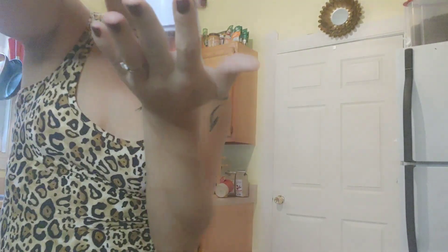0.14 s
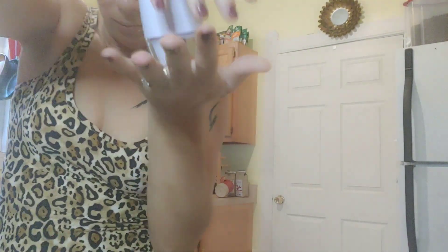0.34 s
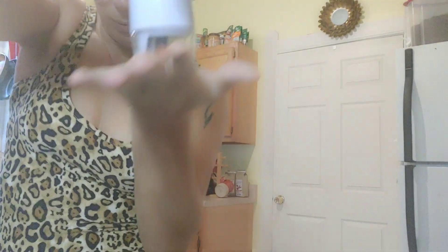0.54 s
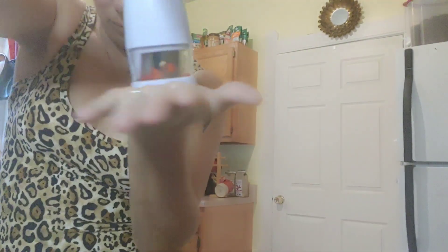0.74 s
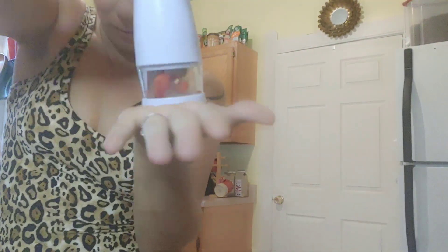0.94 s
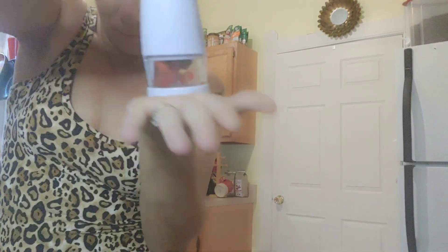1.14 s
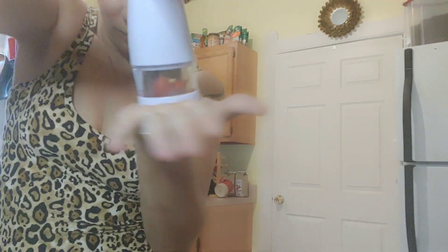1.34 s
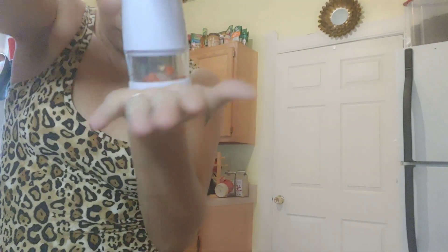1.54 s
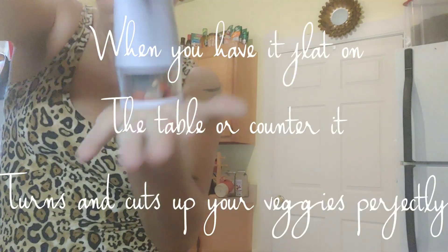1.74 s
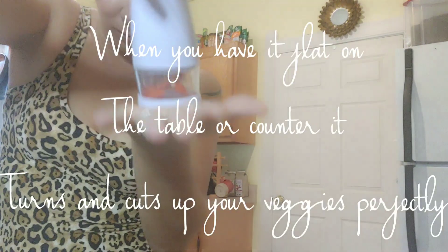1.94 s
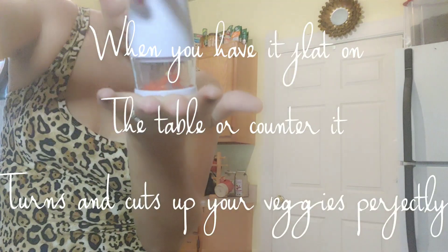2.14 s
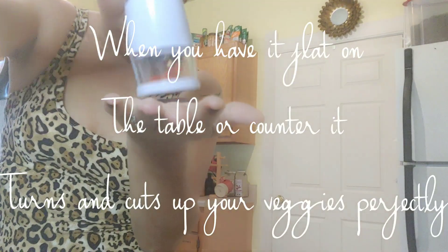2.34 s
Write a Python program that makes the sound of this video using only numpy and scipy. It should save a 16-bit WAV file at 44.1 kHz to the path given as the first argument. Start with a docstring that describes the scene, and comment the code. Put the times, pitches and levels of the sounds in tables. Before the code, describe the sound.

A plastic push chopper clacks rapidly, pumped about four times a second in a small kitchen

```python
"""Over a low rumble and wavering appliance hum comes the bright, chattering clack of a plastic push chopper.
It is pumped about four times a second on an open palm, close by in a small kitchen: shaped noise rubs and scrapes
along the barrel, then a burst of contacts, a thud and a gliding cup note make the dull chop. The spring throws the
plunger back against its stop with the clack, and narrow noise bands ring on. Reflections answer each stroke."""
import sys
import numpy as np
from scipy import signal
from scipy.fft import rfft, irfft, next_fast_len
from scipy.io import wavfile
from scipy.ndimage import uniform_filter1d, map_coordinates

SR = 44100
rng = np.random.default_rng(int(sys.argv[2]) if len(sys.argv) > 2 else 0)


def output_pcm(signal):
    """Save a mono or channel-first signal as 16-bit PCM at the path in sys.argv[1].

    Samples are clipped to [-1, 1] before scaling.
    """
    pcm = np.clip(np.atleast_2d(signal).T, -1, 1) * 32767
    wavfile.write(sys.argv[1], SR, np.round(pcm).astype(np.int16))


N = 110250

# Spectrum of the room rumble: (frequency [Hz], relative density [dB per Hz])
RUMBLE_SPECTRUM = [(20, -15), (45, -2.5), (62, -2), (90, -12.5), (130, -11), (240, -8.5), (400, -16),
                   (800, -27), (1800, -32.5), (4000, -40.5), (7500, -45.5), (9000, -55), (16000, -60)]
# Level of rumble and hum together: (time [s], level [dB])
BACKGROUND_LEVEL = [(0, -57), (.13, -58.5), (.2, -50), (.8, -47.5), (1.8, -47.5), (2.15, -49.5), (2.5, -49)]
# Hum lines: (frequency [Hz], mean level against the rumble [dB])
HUM_LINES = [(43.1, -5), (118.4, -10.5), (228, -8), (275, -11)]

# Decay of the kitchen's tail: (frequency [Hz], time to fall 60 dB [s])
ROOM_T60 = [(150, 0.02), (500, 0.6359), (1400, 0.43), (3700, 0.4826), (7000, .43), (11000, 0.31),
            (16000, 0.51)]
# Colour of that tail: (frequency [Hz], gain [dB])
ROOM_COLOUR = [(150, -2), (400, -4.5), (1000, -4), (2000, -1.5), (4500, -3), (8000, -4.5), (14000, -0.5)]
# Colour of the faint lingering echo: (frequency [Hz], relative gain [dB])
LATE_COLOUR = [(300, 2.5), (1500, 0.5), (5000, -2.5), (7300, -0.5), (9000, -6.5), (15000, -22)]

# Resonances of the barrel: (centre [Hz], width [Hz], gain [dB])
BARREL_MODES = [(1435, 190, -6.5), (1720, 170, -1.5), (1925, 70, 2), (2170, 150, -0.5)]
# Spectrum of the plunger's scrape: (frequency [Hz], relative density [dB per Hz])
SCRAPE_SPECTRUM = [(100, -6.5), (280, -4), (600, -5), (1100, -1), (2900, -4.5), (4300, -0.5), (5900, -3.5),
                   (7100, 5.5), (8600, -11.5), (11800, -7.5), (14000, -28.5), (16000, -34)]
# Spectrum of the chop: (frequency [Hz], relative density [dB per Hz])
CHOP_SPECTRUM = [(100, -24), (300, -10), (600, -5.5), (1100, 0.5), (1800, -10), (2600, -7.5), (5200, -8),
                 (7500, -10), (8600, -16), (11500, -25), (13000, -38.5), (16000, -44)]
# Spectrum of the thud on the palm: (frequency [Hz], relative density [dB per Hz])
THUD_SPECTRUM = [(50, -22), (150, -15), (300, 1.5), (480, 2.5), (800, -10), (2000, -34), (8000, -75)]
# Spectrum of the clack at the stop: (frequency [Hz], relative density [dB per Hz])
CLACK_SPECTRUM = [(100, -22.5), (300, -11), (650, -10), (1100, -2.5), (2000, -2.5), (2900, -11.5),
                  (4500, -3), (5800, -4), (7600, -6), (8700, -12), (12000, -10), (14000, -25), (16000, -37)]
# Spectrum of the knock on the housing: (frequency [Hz], relative density [dB per Hz])
KNOCK_SPECTRUM = [(80, -15), (220, -6.5), (450, -9.5), (700, -7), (1050, 0), (1350, -4.5), (2000, -20),
                  (6000, -55)]

# Pushes: (chop time [s], slide length [s], slide level [dB], scrape over the slide [dB], chop level [dB],
#          chop treble [dB], thud level [dB], cup note level [dB])
PUSHES = [(0.4187, .058, -36, 2.5, -19, -1, -24.5, -35), (0.6793, 0.047, -32, -1, -16.5, -3.5, -24, -30),
          (0.9363, .054, -30, -1, -21.5, 3, -32, -35), (1.167, .041, -29, 1.5, -21, 3.5, -23.5, -31),
          (1.394, .048, -30.5, 0, -21.5, -3, -28.5, -45), (1.626, 0.035, -33.5, 2.5, -16, 2, -26, -44),
          (1.8955, .050, -32.5, -0.5, -17.5, 2.5, -28.5, -44)]
# Returns: (clack time [s], slide length [s], slide level [dB], scrape over the slide [dB], chatter length [s],
#           clack level [dB], clack treble [dB], knock level [dB], spring level [dB], spring pitch [Hz],
#           upper spring ring level [dB], left over right [dB])
RETURNS = [(.214, .044, -33, 2, 0.0039, -17, -3, -30, -26, 7030, -32, 0.5),
           (0.5072, .011, -21, -5.5, 0.0069, -17, 0.8, -33, -17.5, 7230, -33, 1),
           (0.765, .027, -23.5, -3, 0.0063, -15.5, 5, -31, -15, 6960, -36.5, 3),
           (1.005, .021, -22, -5, 0.0048, -22, -7, -30.5, -37, 7080, -44, 0.5),
           (1.2424, .022, -25.5, -1, 0.0049, -17.5, 5.5, -33, -18.5, 7340, -38, 2),
           (1.467, .027, -21.5, 0, .005, -18, 1.5, -30, -20, 7270, -36.5, 0.5),
           (1.6903, .024, -31.5, 3, 0.0038, -13.5, 0, -24, -21.5, 7550, -25, 1.5),
           (1.914, .008, -35.5, 0, 0.0087, -21.5, 1.5, -26, -25, 6900, -40.5, 1.5)]

# The kitchen and the recorder
EARLY_DB, EARLY_T60_S = -5.5, 0.06
LATE_DB, LATE_T60_S = -30.5, 1.4
ROOM_ALIKE_HZ = 330  # below this the two channels' answers grow alike
LEAD_S = 3 / SR  # the direct sound reaches the left channel this much sooner
TOP_HZ = 16000

# The slide
PUSH_SWELL_DB, RETURN_SWELL_DB, SCRAPE_SWELL_DB = 4, 9, 5
SLIDE_ATTACK_SHARE, SLIDE_T60_S = 0.3, 0.04
SLIDE_GRAIN_DB, GRAIN_PER_S = 3, 900
RUB_DB, CLIMB_DB, SCRAPE_PAN_DB = -1.8, 7, 0.8

# The impacts and what they set ringing
CHOP_S, CHOP_T60_S, CLACK_T60_S = 0.0024, 0.010, 0.009
CUP_HZ, CUP_T60_S, CUP_GLIDE_HZ_PER_S = 635.6, 0.26, 500
SPRING_WIDTH_HZ, SPRING_T60_S, SPRING_TAIL_DB = 930, 0.45, -28.5
UPPER_RING_HZ, UPPER_RING_WIDTH_HZ = 11950, 550


def amp(db):
    """Amplitude ratio: twenty decibels for each factor of ten."""
    return 10 ** (np.asarray(db) / 20)


def unit(x):
    """Normalisation of mean power: the rms becomes 1."""
    return x / np.sqrt(np.mean(x ** 2) + 1e-20)


def norm(h):
    """Normalisation of energy: the squares of each channel sum to 1."""
    return h / np.linalg.norm(h, axis=1, keepdims=True)


def along(points, hz):
    """Interpolation of (frequency, value) points on a logarithmic frequency axis."""
    f, v = np.transpose(points)
    return np.interp(np.log(hz + 1), np.log(f + 1), v)


def wobble(rate, size):
    """Slow random modulation: a smooth curve through rate random knots a second."""
    knots = rng.standard_normal(size // 8)
    return map_coordinates(knots, [np.arange(size) * rate / SR], mode="wrap")


def grid():
    """Sampling of one stroke: the times and frequencies of its buffer."""
    size = 2 ** 14
    return np.arange(size) / SR, np.fft.rfftfreq(size, 1 / SR)


def coloured(x, db):
    """Minimum-phase filtering: folding the cepstrum makes a unit-power gain curve causal."""
    cepstrum = irfft(np.log(np.maximum(unit(amp(db)), 1e-6)))
    half = len(cepstrum) // 2
    cepstrum[1:half] *= 2
    cepstrum[half + 1:] = 0
    return irfft(rfft(x) * np.exp(rfft(cepstrum)))


def treble(db, hz, corner_hz=3000):
    """Contact hardness: a harder impact tilts the spectrum, db from bass to treble."""
    return db * (hz ** 4 / (hz ** 4 + corner_hz ** 4) - 0.5)


def add(out, x, s):
    """Superposition: sound x is summed into out from time s."""
    i = max(round(s * SR), 0)
    out[..., i:i + x.shape[-1]] += x[..., :out.shape[-1] - i]


def background():
    """Noise and tones of changing level: rumble, nearly alike in both channels in the bass, and a wavering hum."""
    t, hz = np.arange(N) / SR, np.fft.rfftfreq(N, 1 / SR)
    side_db = along([(50, -18.5), (250, -12.5), (1000, 1.5), (4000, -2)], hz)
    gain = amp(along(RUMBLE_SPECTRUM, hz) + np.array([0 * hz, side_db]))
    mid, side = irfft(rfft(rng.standard_normal((2, N))) * gain, N)
    rumble = unit(np.array([mid + side, mid - side]))
    hum = 0
    for f, db in HUM_LINES:
        level = amp(db + 2.5 * wobble(9, N))
        phase = 2 * np.pi * f * t + 0.9 * wobble(9, N)
        hum = hum + level * np.sqrt(2) * np.sin(phase)
    level = amp(np.interp(t, *np.transpose(BACKGROUND_LEVEL)))
    return (rumble + hum) * level * amp([[0.5], [-0.5]])


def kitchen():
    """Reverberation: early reflections and a frequency-dependent tail, alike in both channels in the bass."""
    t, hz = grid()
    f, frames, z = signal.stft(rng.standard_normal((2, len(t))), SR, nperseg=256)
    decay = amp(-60 * frames / along(ROOM_T60, f)[:, None])
    tail = signal.istft(z * decay, SR, nperseg=256)[1]
    tail = norm(tail * np.clip(t / 0.0094, 0, 1))  # the tail builds up over 9.4 ms
    colour = along(ROOM_COLOUR, hz)
    # The last factor restores the gain that coloured() normalises away
    tail = coloured(tail, colour) * np.sqrt(np.mean(amp(colour) ** 2))
    early = norm(rng.standard_normal((2, len(t))) * amp(-60 * t / EARLY_T60_S))
    mid, side = tail + amp(EARLY_DB) * early
    side = signal.lfilter(*signal.butter(1, ROOM_ALIKE_HZ, "high", fs=SR), side)
    return np.array([mid + side, mid - side]) / np.sqrt(2)


def heard(x, room, pan_db, room_db):
    """Convolution with an impulse response: the direct sound, left channel first, and the room's answer."""
    response = amp(room_db) * room
    response[0, 0] += 1
    response[1, round(LEAD_S * SR)] += 1
    return signal.fftconvolve(x[None], response, axes=1) * amp([[pan_db / 2], [-pan_db / 2]])


def lingering_echo(dry):
    """Late reverberation: convolution with faint, slowly decaying coloured noise."""
    t, hz = np.arange(SR) / SR, np.fft.rfftfreq(SR, 1 / SR)
    noise = rng.standard_normal((2, SR)) * amp(-60 * t / LATE_T60_S)
    late = norm(coloured(noise, along(LATE_COLOUR, hz)))
    return amp(LATE_DB) * signal.fftconvolve(dry, late, axes=1)[:, :N]


def barrel_modes(hz):
    """Resonance: each mode passes a band about its centre; alternate modes have opposite sign."""
    modes = []
    for k, (centre, width, db) in enumerate(BARREL_MODES):
        damping = 1j * hz * width
        modes.append((-1) ** k * amp(db) * damping / (centre * centre - hz * hz + damping))
    return modes


def slide(room, length, scrape_db, swell_db, pan_db):
    """Friction exciting resonances: the rub swells up to the stop, climbing from low barrel modes to high ones."""
    t, hz = grid()
    to_go = np.minimum(t / length - 1, 0)  # -1 at the start, 0 at the stop
    attack = np.clip(t / (SLIDE_ATTACK_SHARE * length), 0, 1)
    env = attack * amp(swell_db * to_go - 60 * np.maximum(t - length, 0) / SLIDE_T60_S)
    grains = env * unit(amp(SLIDE_GRAIN_DB * wobble(GRAIN_PER_S, len(t))))

    modes = barrel_modes(hz)
    friction = grains * rng.standard_normal(len(t))
    climb = amp(CLIMB_DB * (to_go + 0.5))
    low = rfft(friction / climb) * sum(modes[:2])
    high = rfft(friction * climb) * sum(modes[2:])
    rub = irfft(low + high) / np.sqrt(np.mean(abs(sum(modes)) ** 2))

    scrape = grains * amp(SCRAPE_SWELL_DB * to_go) * rng.standard_normal(len(t))
    scrape = coloured(scrape, along(SCRAPE_SPECTRUM, hz))
    rub = amp(RUB_DB) * heard(rub, room, pan_db=pan_db, room_db=-1.5)
    return rub + amp(scrape_db) * heard(scrape, room, pan_db=SCRAPE_PAN_DB, room_db=-1.0)


def chatter(length, t60):
    """Repeated impact: dense plastic contacts give noise of even spectrum, held for length and then decaying."""
    t, _ = grid()
    env = amp(-60 * np.maximum(t - length, 0) / t60)
    burst = env * rng.standard_normal(len(t))
    power = abs(uniform_filter1d(abs(rfft(burst)) ** 2, size=125))
    burst = coloured(burst, -10 * np.log10(power + 1e-12))  # flattens the smoothed spectrum
    return burst * np.linalg.norm(env) / np.linalg.norm(burst)


def cup_note(level_db):
    """Cavity resonance: a decaying sine, short and hollow, whose pitch glides upward."""
    t, _ = grid()
    phase = 2 * np.pi * (CUP_HZ + CUP_GLIDE_HZ_PER_S * t / 2) * t
    return amp(level_db - 60 * t / CUP_T60_S) * np.sin(phase)


def spring(chatter_s, centre_hz, width_hz):
    """Forced and free vibration: a band of close coil modes, shaken by the chatter and ringing on."""
    _, hz = grid()
    shake = chatter(chatter_s, CLACK_T60_S) + amp(SPRING_TAIL_DB) * chatter(0, SPRING_T60_S)
    return coloured(shake, -10 * np.log10(1 + (2 * (hz - centre_hz) / width_hz) ** 6))


def pushes():
    """Impact after friction: the blades slide down and chop, with a thud on the palm and a note of the cup."""
    out, (t, hz) = np.zeros((2, N)), grid()
    for s, length, slide_db, scrape_db, chop_db, treble_db, thud_db, cup_db in PUSHES:
        room = kitchen()
        rub = slide(room, length, scrape_db, PUSH_SWELL_DB, pan_db=-3)
        add(out, amp(slide_db) * rub, s - length)
        colour = along(CHOP_SPECTRUM, hz) + treble(treble_db, hz)
        crack = amp(chop_db) * coloured(chatter(CHOP_S, CHOP_T60_S), colour)
        impulse = (t == 0) * np.sqrt(CHOP_S * SR)
        thud = amp(thud_db) * coloured(impulse, along(THUD_SPECTRUM, hz))
        add(out, heard(crack + thud, room, pan_db=1.5, room_db=1.5), s)
        add(out, cup_note(cup_db), s)
    return out


def returns():
    """Elastic recoil: the plunger flies back, knocks the housing, chatters at its stop and rings the steel spring."""
    out, (_, hz) = np.zeros((2, N)), grid()
    for (s, length, slide_db, scrape_db, chatter_s, clack_db, treble_db, knock_db,
         spring_db, spring_hz, upper_db, pan_db) in RETURNS:
        room = kitchen()
        rub = slide(room, length, scrape_db, RETURN_SWELL_DB, pan_db=-5)
        add(out, amp(slide_db) * rub, s - length)
        colour = along(CLACK_SPECTRUM, hz) + treble(treble_db, hz)
        clack = amp(clack_db) * coloured(chatter(chatter_s, CLACK_T60_S), colour)
        knock = amp(knock_db) * coloured(chatter(chatter_s, CLACK_T60_S), along(KNOCK_SPECTRUM, hz))
        add(out, heard(clack + knock, room, pan_db=pan_db, room_db=-1), s)
        ring = amp(spring_db) * spring(chatter_s, spring_hz, SPRING_WIDTH_HZ)
        add(out, heard(ring, room, pan_db=-10, room_db=-0.5), s)
        upper = amp(upper_db) * spring(chatter_s, UPPER_RING_HZ, UPPER_RING_WIDTH_HZ)
        add(out, heard(upper, room, pan_db=8.5, room_db=-1.0), s)
    return out


def scene():
    """Superposition of the background, the chopper and its lingering echo."""
    chopper = pushes() + returns()
    return background() + chopper + lingering_echo(chopper)


def round_off(x):
    """Soft saturation: the output approaches 0.85 of full scale however large the input."""
    return x / (1 + (x / 0.85) ** 4) ** (1 / 4)


def record(dry):
    """Saturation and band limiting: the recorder rounds off peaks and keeps nothing above TOP_HZ."""
    size = next_fast_len(N + SR // 2)
    passed = np.fft.rfftfreq(size, 1 / SR) < TOP_HZ
    return irfft(rfft(round_off(dry), size) * passed, size)[:, :N]


dry = scene()
out = record(dry)
output_pcm(out)
```